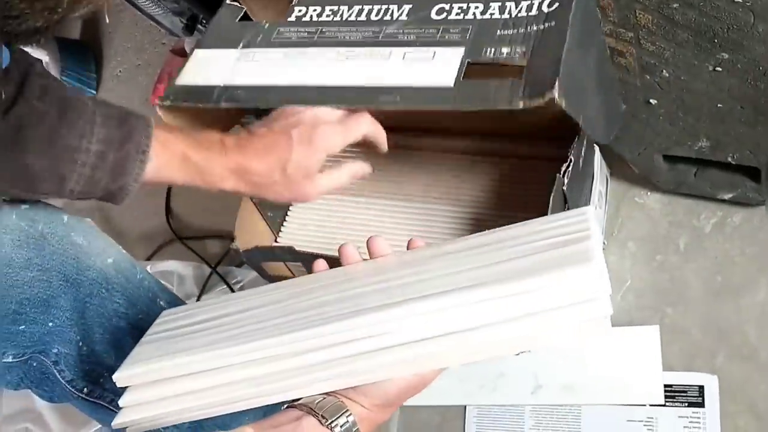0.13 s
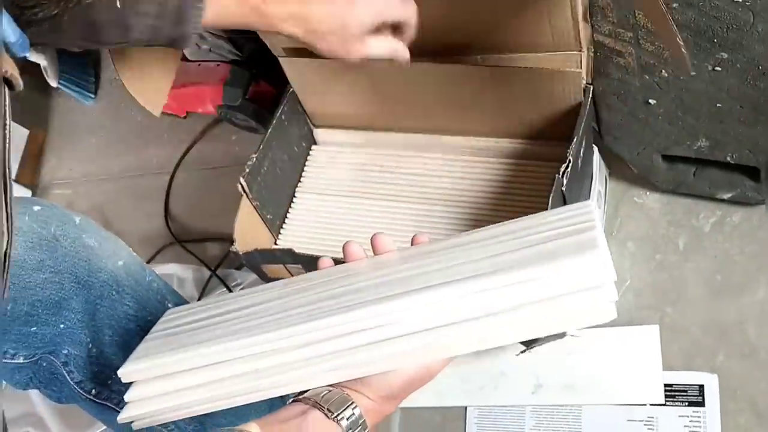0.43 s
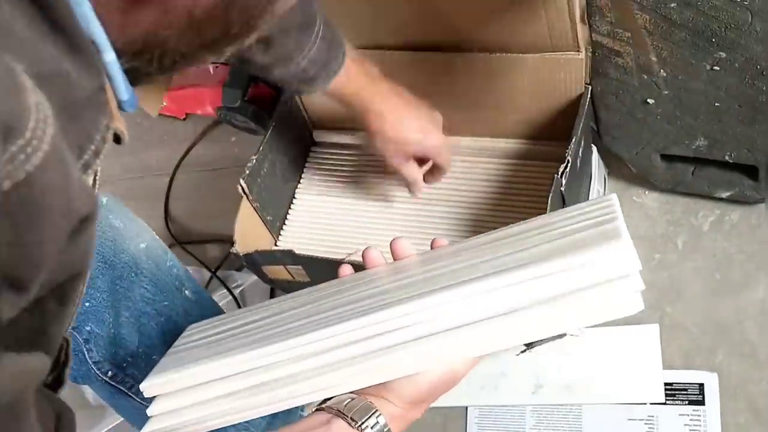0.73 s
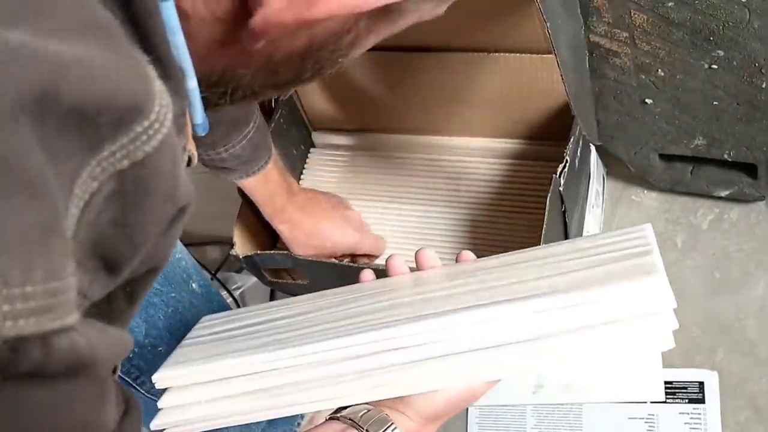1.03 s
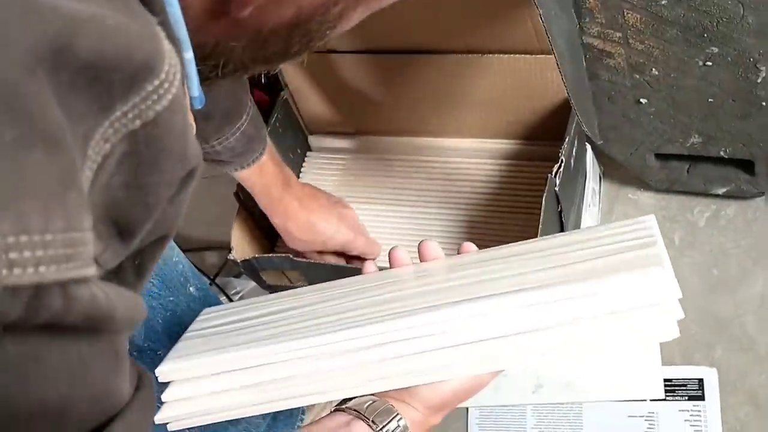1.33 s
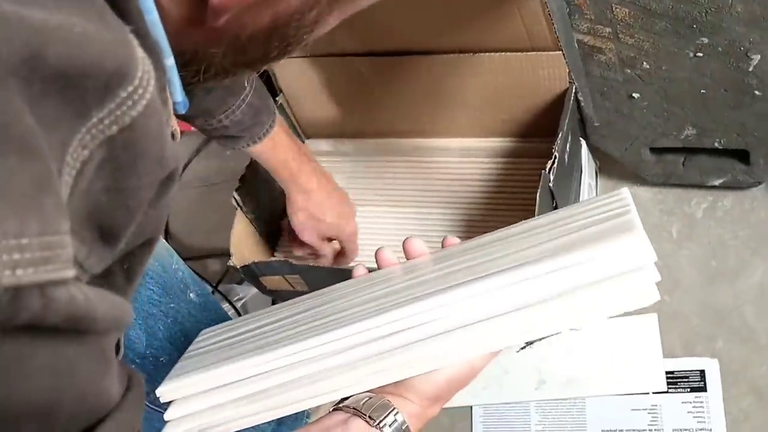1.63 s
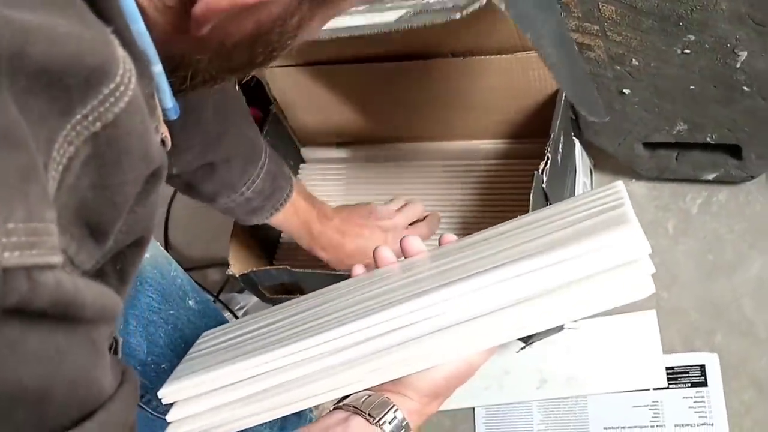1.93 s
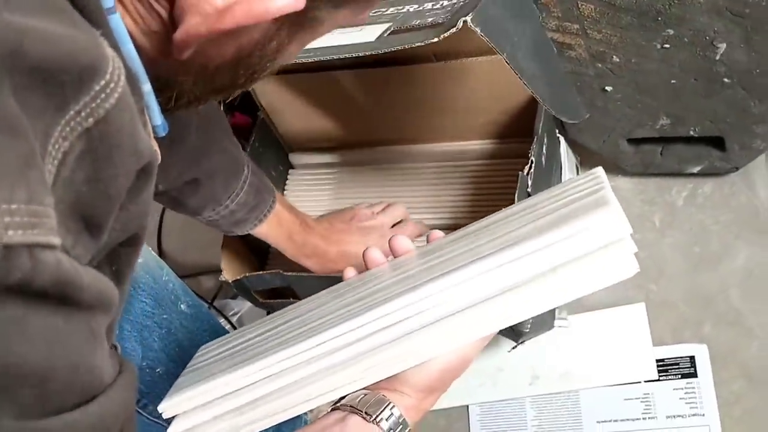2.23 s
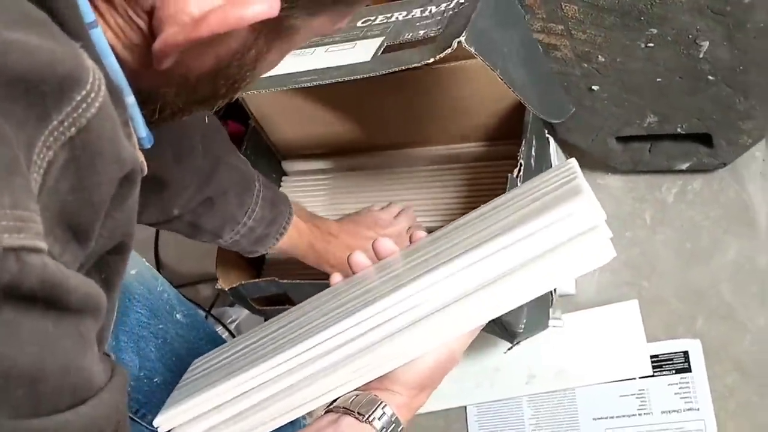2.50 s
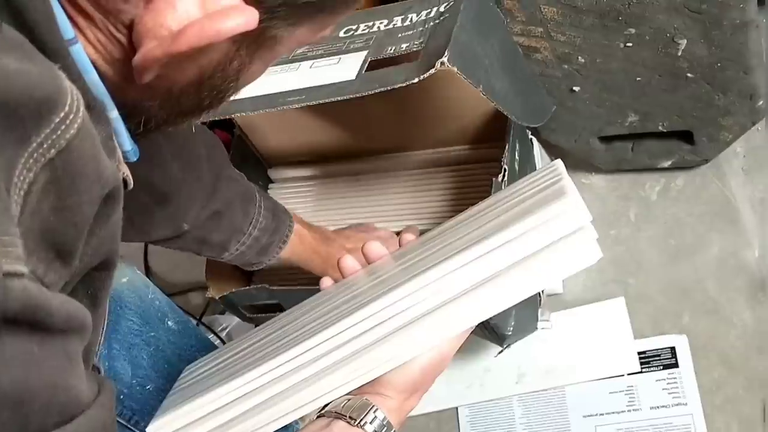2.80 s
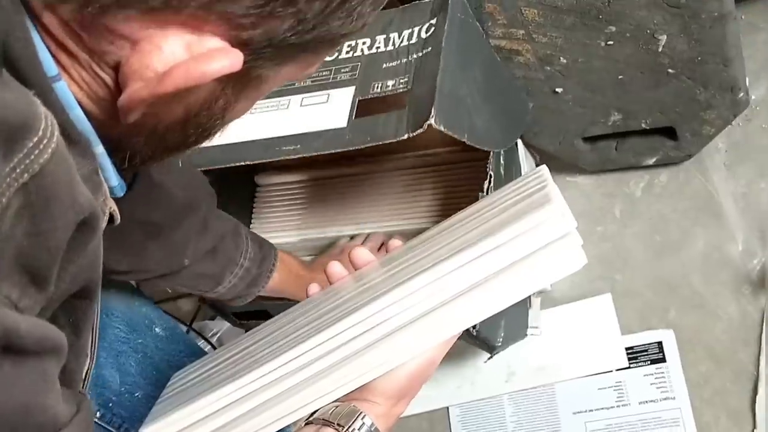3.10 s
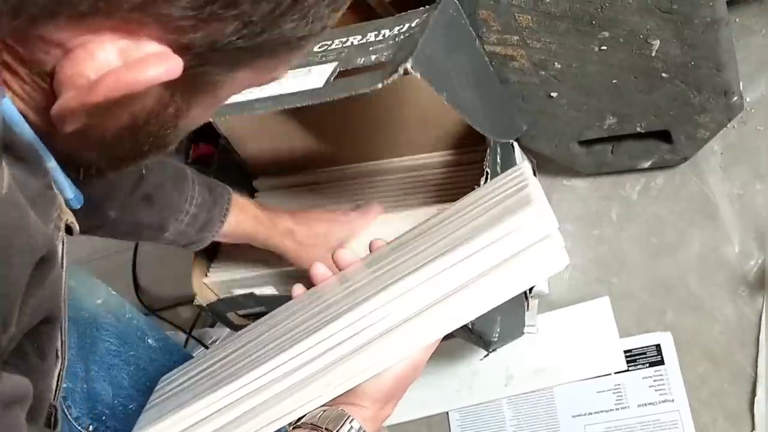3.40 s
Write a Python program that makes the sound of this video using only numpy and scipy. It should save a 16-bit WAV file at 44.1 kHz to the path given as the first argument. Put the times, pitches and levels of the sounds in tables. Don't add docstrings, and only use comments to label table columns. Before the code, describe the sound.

Ceramic tiles handled in a cardboard box: hollow bumps, sleeve swishes and card scratching first, then faint gliding, bright clacks, and a tipping stack that thuds and grinds; close stereo microphone in a small workshop.

```python
import sys
import numpy as np
from scipy import signal
from scipy.fft import rfft, irfft
from scipy.io import wavfile

SR = 44100
rng = np.random.default_rng(int(sys.argv[2]) if len(sys.argv) > 2 else 0)


def gain_from_db(level_db):
    decades = np.asarray(level_db, float) / 20
    return 10 ** decades


def store_pcm(level_fs):
    pcm = np.round(np.clip(level_fs, -1, 1) * 32767).astype(np.int16)
    wavfile.write(sys.argv[1], SR, np.atleast_2d(pcm).T)


N = 156555


def rms_one(x):
    return x / np.sqrt(np.mean(x ** 2) + 1e-20)


def cut(x, hz, kind, order=2):
    return signal.sosfilt(signal.butter(order, hz, kind, fs=SR, output="sos"), x)


def at_hz(points):
    hz, value = np.transpose(points)
    return np.interp(np.log(np.fft.rfftfreq(N, 1 / SR) + 1), np.log(hz), value)


def drift(rate_hz):
    step = 40
    r = np.exp(-2 * np.pi * step * rate_hz / SR)
    noise = rng.standard_normal(N // step + 2002)
    slow = signal.lfilter([1], [1, -2 * r, r * r], noise)[2000:]
    return np.interp(np.arange(N) / step, np.arange(len(slow)), rms_one(slow))


def ring(clicks, hz, t60_s):
    r, w = gain_from_db(-60 / (t60_s * SR)), 2 * np.pi * hz / SR
    return signal.lfilter([0, np.sin(w)], [1, -2 * r * np.cos(w), r * r], clicks + 1e-18)


def body(drive, modes):
    return sum((-1) ** k * gain_from_db(db) * ring(drive, hz, t60_s) for k, (hz, db, t60_s) in enumerate(modes))


def touch(s, db, contact_ms):
    out, size = np.zeros(N + SR), max(int(contact_ms * SR / 1000), 1)
    push = np.sin(np.pi * (np.arange(size) + .5) / size)
    start = int(s * SR)
    out[start:start + size] = gain_from_db(db) * push / push.sum()
    return out[:N]


def strokes(rows):
    crest_shape = 1.57
    t, power = np.arange(N) / SR, 0
    for s, rise_s, fall_s, *db in rows:
        away = np.where(t < s, (s - t) / rise_s, (t - s) / fall_s)
        power = power + gain_from_db(np.array(db)[:, None] - 20 * away ** crest_shape) ** 2
    return np.sqrt(power)


def hiss(spectrum, lumpy_db, rate_hz):
    alike_below_hz = 510
    mid, side = rfft(rng.standard_normal((2, N)) * gain_from_db(lumpy_db * drift(rate_hz)))
    alike = 1 / (1 + (np.fft.rfftfreq(N, 1 / SR) / alike_below_hz) ** 3)
    ripple_db = 3 * drift(2)[:N // 2 + 1]
    both = np.sqrt(1 + alike) * mid + np.sqrt(1 - alike) * side * [[1], [-1]]
    return rms_one(irfft(gain_from_db(at_hz(spectrum) + ripple_db) * both, N))


def grains(spread_db, per_s):
    height = gain_from_db(spread_db * np.minimum(rng.exponential(1, N), 4))
    return height * rng.choice([-1, 1], N) * (rng.random(N) < per_s / SR)


# (frequency [Hz], density [dB per Hz])
AIR_COLOUR = [(40, -11.5), (80, 0.5), (160, -2), (400, -15), (1500, -15.5), (3000, -16.5), (6000, -17.5),
              (16000, -24.5)]


def air():
    return gain_from_db(-70) * hiss(AIR_COLOUR, lumpy_db=1, rate_hz=10)


# (crest [s], rise [s], fall [s], level [dB])
SHUDDERS = [
    (.03, 0.11, .1, -42),
    (.33, 0.12, 0.087, -55),
    (.44, .03, .08, -52),
    (.61, 0.051, 0.11, -41),
    (.72, .05, .12, -51),
    (.97, .08, .15, -56),
    (1.5, .06, .08, -58),
    (1.95, 0.14, .15, -68),
    (2.8, 0.088, .1, -64),
]


def shudder():
    return strokes(SHUDDERS)[0] * rms_one(ring(rng.standard_normal(N), hz=77, t60_s=0.18))


# (crest [s], rise [s], fall [s], level [dB])
SLEEVE_STROKES = [
    (.13, 0.03, 0.1, -56.5),
    (.29, 0.056, 0.07, -61.5),
    (.485, 0.11, 0.085, -57.5),
    (.595, 0.02, 0.2, -54),
    (.708, 0.02, 0.13, -50.5),
    (.93, 0.23, 0.28, -58.5),
    (1.05, 0.2, 0.26, -62.5),
    (1.58, 0.04, 0.079, -56.5),
    (1.7, 0.069, 0.07, -61.5),
]
# (frequency [Hz], density [dB per Hz])
SLEEVE_COLOUR = [(1500, -14), (3000, -25.5), (4400, -15), (6000, -16), (11000, -14), (14500, -11.5),
                 (16000, -46)]


def sleeve():
    return strokes(SLEEVE_STROKES) * hiss(SLEEVE_COLOUR, lumpy_db=2.5, rate_hz=11.4)


# (crest [s], rise [s], fall [s], scratch level [dB], boom level [dB])
DRAGS = [(.02, 0.34, 0.1, -48, -42.5), (.15, 0.074, 0.097, -50, -50.5), (.3, 0.22, 0.11, -60.5, -70),
         (.425, 0.035, 0.03, -60.5, -59.5), (.51, 0.021, 0.1, -68.5, -59.5), (.6, 0.024, 0.16, -48, -50.5),
         (.72, 0.069, 0.11, -46, -38), (.95, 0.19, 0.69, -61, -59.5), (1.12, 0.18, 0.1, -67, -60),
         (1.19, 0.044, 0.084, -70, -66), (1.445, 0.019, 0.08, -54.5, -67),
         (1.565, 0.032, 0.085, -60.5, -61), (1.625, 0.074, 0.084, -47, -48.5),
         (1.7, 0.065, 0.13, -58.5, -59.5), (2.15, 0.22, 0.44, -59.5, -67.5), (2.38, 0.33, 0.27, -66, -78),
         (2.65, 0.055, 0.11, -57, -86), (2.82, 0.051, 0.056, -45, -79), (2.97, 0.14, 0.13, -47.5, -59),
         (3.1, 0.25, 0.21, -46.5, -53), (3.22, 0.11, 0.17, -39.5, -39.5), (3.4, .1, 0.045, -47, -71),
         (3.55, 0.069, 0.083, -66, -58.5)]
# (frequency [Hz], density [dB per Hz])
SCRATCH_COLOUR = [(200, -12), (380, -7.5), (700, -8.5), (1300, -8), (2200, -13), (3000, -18.5),
                  (4800, -22.5), (7500, -36.5)]
# (frequency [Hz], level [dB], t60 [s])
BOX_MODES = [(72, -0.5, 0.18), (122.2, -9.5, 0.37), (154.6, 1, 0.25), (203.4, -2.5, 0.073),
             (253, -6.5, 0.088), (345.8, -3.5, 0.12), (626.4, -6.5, 0.073)]


def drag():
    scratch, press = strokes(DRAGS)
    boom = press * rms_one(body(rng.standard_normal(N), BOX_MODES))
    return boom, scratch * hiss(SCRATCH_COLOUR, lumpy_db=2.5, rate_hz=29)


# (time [s], peak level [dB])
BOX_BUMPS = [(0.011, -25.5), (0.046, -35), (0.419, -35), (0.579, -33), (0.68, -26.5), (0.706, -21.5),
             (0.895, -39.5), (0.939, -44), (1.104, -38), (1.175, -49), (1.558, -44), (1.617, -26),
             (1.661, -31.5)]


def bumps():
    return body(sum(touch(s, db - 11.5, contact_ms=2.9) for s, db in BOX_BUMPS), BOX_MODES)


# (start [s], length [s], frequency [Hz], width [Hz], level [dB], fade [dB per s])
FLAP_MOVES = [
    (0.001, 0.42, 1650, 60, -54, 42),
    (0.583, 0.11, 770, 54, -45, 26),
    (0.875, 0.27, 1200, 120, -64, 5),
    (1.17, .2, 1700, 60, -75, 10),
    (1.25, .09, 350, 40, -65, 20),
    (1.44, .1, 1230, 30, -66, 60),
    (3.336, 0.18, 1380, 151, -47, 18),
]


def flaps():
    t, out = np.arange(N) / SR, 0
    for s, length_s, hz, width_hz, db, fade_db_per_s in FLAP_MOVES:
        shake = rng.standard_normal(N) * gain_from_db(2.55 * drift(35))
        band = rms_one(ring(ring(shake, hz, 1 / width_hz), hz, 1 / width_hz))
        gate = np.clip(np.minimum((t - s) * 4, s + length_s - t) / 0.044, 0, 1)
        out = out + band * gain_from_db(db - fade_db_per_s * (t - s)) * gate
    return out


# (time [s], level [dB], lowest [Hz], highest [Hz], t60 [s])
TILE_SCUFFS = [(.056, -46, 1000, 2360, 0.1), (0.112, -44.5, 900, 6130, 0.22), (.497, -54, 500, 940, 0.17),
               (.586, -46, 300, 1500, 0.12), (.703, -47, 2000, 15000, 0.074), (1.432, -49, 906, 5560, 0.13),
               (1.434, -55, 200, 350, 0.12), (1.54, -65, 500, 9000, 0.09), (1.557, -56, 837, 9100, 0.22),
               (1.595, -51.5, 900, 5000, .15), (1.62, -47.5, 910, 4800, 0.16),
               (1.768, -54, 600, 2970, 0.037), (1.9235, -66, 1200, 12000, .03),
               (2.475, -53, 1000, 6000, 0.06), (2.817, -43.5, 1500, 6000, .08),
               (3.393, -35.5, 1010, 2450, 0.19), (3.47, -39.5, 700, 1500, .1)]


def scuffs():
    attack_s = 0.0023
    out, t = np.zeros((2, N + SR)), np.arange(SR // 4) / SR
    noises = rng.standard_normal((len(TILE_SCUFFS), 2, len(t)))
    for (s, db, low_hz, high_hz, t60_s), noise in zip(TILE_SCUFFS, noises):
        grit = rms_one(cut(noise ** 3, [low_hz, high_hz], "band"))
        start = int(s * SR)
        out[:, start:start + len(t)] += grit * gain_from_db(db - 60 * t / t60_s) * (1 - np.exp(-t / attack_s))
    return out[:, :N]


# (crest [s], rise [s], fall [s], hiss level [dB], ringing level [dB])
SLIDES = [
    (2.1, 0.09, 0.43, -67, -75),
    (2.25, 0.11, 0.21, -59, -66.5),
    (2.47, 0.16, 0.15, -62, -68),
    (2.93, 0.091, .04, -57, -54.5),
    (2.97, 0.037, 0.058, -43.5, -48),
    (3.08, 0.1, 0.35, -50, -50),
    (3.2, 0.17, 0.65, -42, -59),
    (3.34, 0.041, 0.079, -49, -49),
    (3.55, 0.18, 0.088, -36.5, -58),
]
# (frequency [Hz], density [dB per Hz])
GLIDE_COLOUR = [(2500, -3.5), (4000, -17.5), (5700, -11.5), (7000, -12.5), (9500, -9.5), (11000, -18),
                (14500, -15), (16000, -55)]
# (pitch ratio [1], level [dB], t60 [s])
EDGE_MODES = [(.72, -3.5, 0.0066), (.83, -1.5, 0.025), (.89, -1.5, 0.02), (.95, -1.5, 0.022),
              (1.032, 0, 0.016), (1.168, -13.5, 0.024)]
GLAZE_HZ = 5100


def slide():
    fine, coarse = strokes(SLIDES)
    catches = grains(spread_db=2.4, per_s=300)
    rung = rms_one(body(catches, [(GLAZE_HZ * ratio, db, t60_s) for ratio, db, t60_s in EDGE_MODES]))
    return coarse * rung, fine * hiss(GLIDE_COLOUR, lumpy_db=2.73, rate_hz=17.4)


# (time [s], peak level [dB])
EDGE_TICKS = [(2.9151, -40.5), (2.9714, -39), (2.9794, -42), (3.0624, -36.5), (3.0844, -35), (3.1014, -40),
              (3.1144, -38), (3.1344, -43), (3.1774, -33), (3.1864, -32), (3.2044, -34), (3.2214, -41),
              (3.2585, -35.5), (3.3394, -40), (3.3533, -34), (3.3694, -46), (3.3824, -42)]


def ticks():
    out = np.zeros(N)
    for ratio, mode_db, t60_s in EDGE_MODES:
        luck_db = rng.normal(0, 4.5, len(EDGE_TICKS))
        drive = sum(touch(s, db + mode_db - 6.5 + own_db, contact_ms=.05)
                    for (s, db), own_db in zip(EDGE_TICKS, luck_db))
        out += ring(drive, GLAZE_HZ * ratio, t60_s)
    return out


# (crest [s], rise [s], fall [s], level [dB])
GRINDS = [
    (3.0, 0.1, 0.08, -61.5),
    (3.12, 0.049, 0.17, -49.5),
    (3.27, 0.083, 0.089, -60),
    (3.36, 0.068, 0.1, -43),
    (3.42, .05, 0.073, -54),
    (3.52, 0.085, .1, -45.5),
]


def chatter():
    knocks = grains(spread_db=4.9, per_s=500)
    dealt = rng.integers(0, 12, N)
    pitches_hz = np.geomspace(900, 3600, num=12)
    faces = sum(ring(knocks * (dealt == k), hz, 31.0 / hz) for k, hz in enumerate(pitches_hz))
    return strokes(GRINDS)[0] * rms_one(faces)


# (time [s], level [dB], contact [ms])
STACK_THUDS = [
    (3.161, -32.5, 0.4),
    (3.166, -18, 1.28),
    (3.199, -26, 0.96),
    (3.221, -33, 0.95),
    (3.254, -30.5, 1.26),
    (3.285, -33, 1.2),
]
# (frequency [Hz], level [dB], t60 [s])
STACK_MODES = [(260.4, -0.5, 0.098), (430, -2, 0.012), (648, -4, 0.062), (1016, 3, 0.041), (1220, -15, .03),
               (1676, 6.5, 0.073)]


def thuds():
    return body(sum(touch(*hit) for hit in STACK_THUDS), STACK_MODES)


# (time [s], peak level [dB], edge pitch [Hz], face over edge [dB], grit over edge [dB])
TILE_CLACKS = [(0.1142, -37.5, 4520, 7, 8.5), (1.4355, -44, 4500, -7, -22), (1.6222, -38.5, 4160, -8, -21),
               (2.0248, -55, 4660, -21, 0.5), (2.2091, -50, 4400, 10, 13.5), (2.3354, -55, 4620, 3.5, -10),
               (2.63, -33, 4720, -5.5, -6), (2.791, -29.5, 4930, -7.5, -13), (2.817, -32, 4920, -21.5, -4),
               (2.903, -44, 5000, -17, -16), (2.9348, -32, 4780, -17, -24), (2.9562, -29, 5230, -16.5, -22),
               (2.9635, -28.5, 5010, -15.5, -32), (3.005, -29.5, 5400, -14, -7.5),
               (3.0521, -23.5, 5410, -13, -9), (3.0726, -36, 5100, -20, -27),
               (3.1603, -41.5, 4540, 14, 13.5), (3.1715, -31.5, 5030, -22, -7), (3.3274, -39, 4720, 7, 0)]
# (frequency [Hz], level [dB], t60 [s])
FACE_MODES = [(559.4, -5.5, 0.13), (2710, -3, 0.033), (1200, -1, 0.032), (1690, -1.5, 0.04),
              (1774, 7, 0.051), (2040, 11, 0.0082)]


def clacks():
    clack_gain_db, face_gain_db, grit_gain_db, grit_t60_s = -2, -2, -4, .06
    out, t = np.zeros(N + SR), np.arange(SR // 5) / SR
    luck_db = rng.normal(0, 1.4, (len(TILE_CLACKS), 16))
    sand = rng.standard_normal((len(TILE_CLACKS), len(t)))
    click = np.exp(-t * SR / 1.74) / 4
    click = click + np.roll(click, 26) + np.roll(click, 62)
    for (s, db, hz, face_db, grit_db), own_db, noise in zip(TILE_CLACKS, luck_db, sand):
        edge = body(click, [(hz * ratio, mode_db + o, t60_s)
                            for (ratio, mode_db, t60_s), o in zip(EDGE_MODES, own_db)])
        face = body(click, [(f, mode_db + o + face_db + face_gain_db, t60_s)
                            for (f, mode_db, t60_s), o in zip(FACE_MODES, own_db[6:])])
        grit = cut(noise, [2500, 11000], "band", order=1)
        grit = grit * gain_from_db(grit_gain_db + grit_db - 60 * t / grit_t60_s)
        start = int(s * SR) - 30
        out[start:start + len(t)] += gain_from_db(db + clack_gain_db) * (edge + face + grit)
    return out[:N]


def room(x):
    t60_s, wall_cut_hz, buildup_s = .28, 6000, 0.0017
    t = np.arange(SR // 2) / SR
    noise = rng.standard_normal((2, len(t))) * (1 - np.exp(-t / buildup_s))
    dull = cut(noise, wall_cut_hz, "low", order=1)
    tail = dull * gain_from_db(-60 * t / t60_s) + (noise - dull) * gain_from_db(-100 * t / t60_s)
    return signal.fftconvolve(x[None], rms_one(tail) / np.sqrt(len(t)))[:, :N]


def scene():
    boom, scratch = drag()
    boom = boom + bumps() + flaps()
    rung, glide = slide()
    tiles = clacks() + thuds() + rung + ticks() + chatter()
    wet = cut(room(gain_from_db(-8) * tiles + gain_from_db(-14) * boom), 266, "high")
    solid = boom + np.array([np.roll(tiles, 8), tiles]) + wet
    return solid + scratch + glide + sleeve() + air() + scuffs() + shudder()


def band_limit(x):
    return signal.sosfilt(signal.butter(12, 15830, fs=SR, output="sos"), x)


# (frequency [Hz], left minus right [dB])
PORT_TILT = [(300, -0.5), (700, 1), (2000, -1), (3300, -2.5), (5000, -17), (6500, -4.5), (12000, 2)]


def record(dry):
    tilt = gain_from_db(at_hz(PORT_TILT) / 2 * np.array([[1], [-1]]))
    heard = irfft(rfft(dry) * tilt / np.sqrt(np.mean(tilt ** 2, axis=0)), N)
    heard = cut(heard, 125.6, "high", order=3)
    heard = cut(heard, 15600, "low", order=16)
    return band_limit(heard)


dry = scene()
out = record(dry)
store_pcm(out)
```